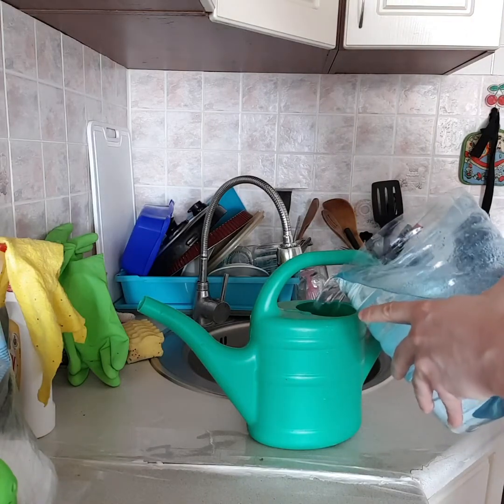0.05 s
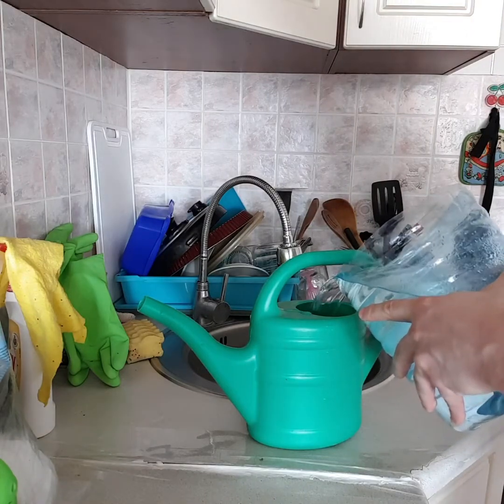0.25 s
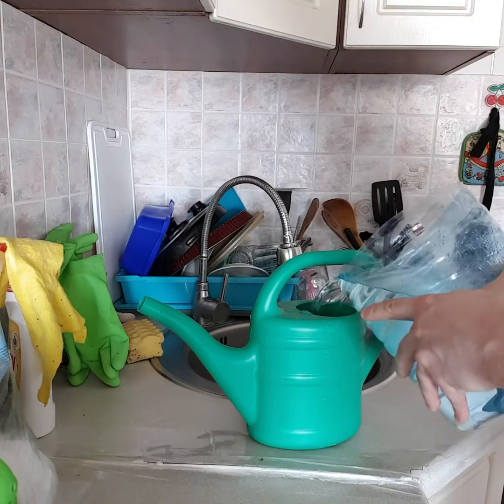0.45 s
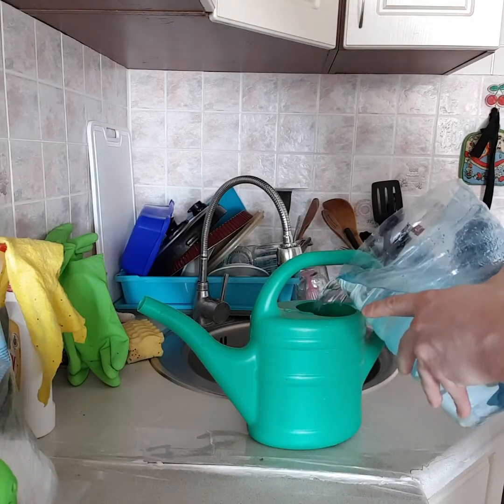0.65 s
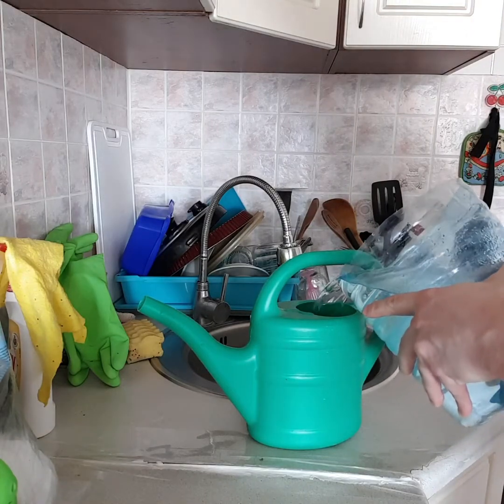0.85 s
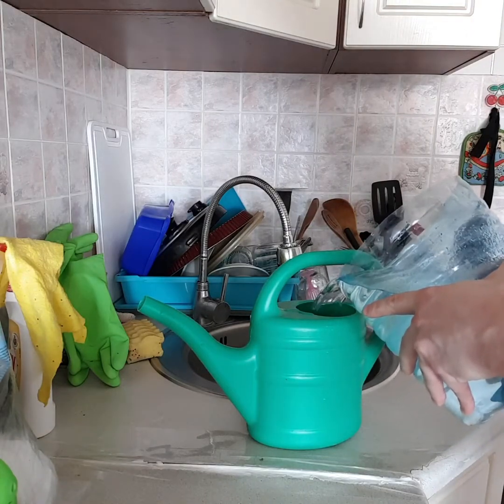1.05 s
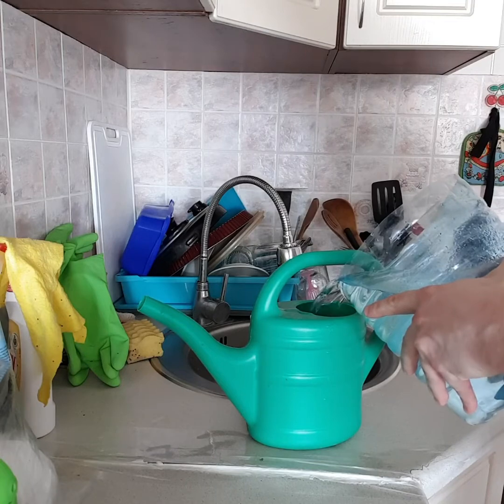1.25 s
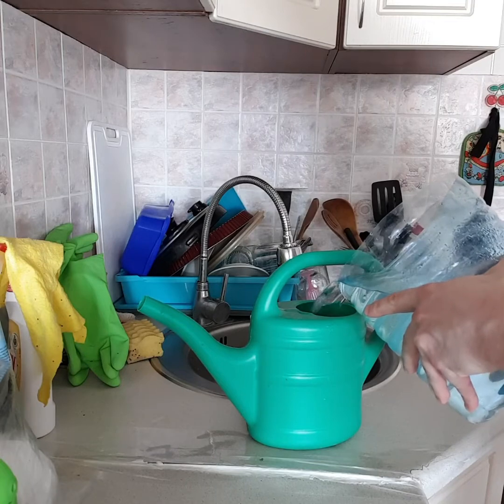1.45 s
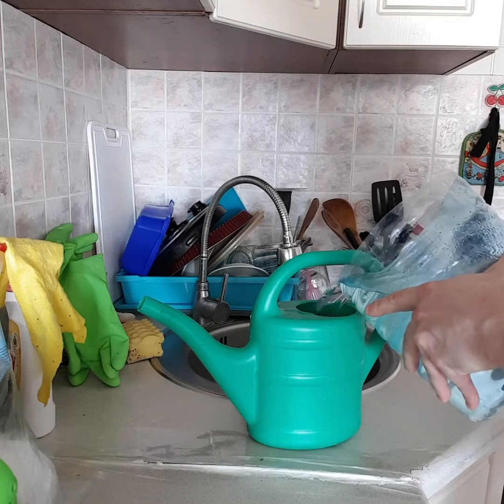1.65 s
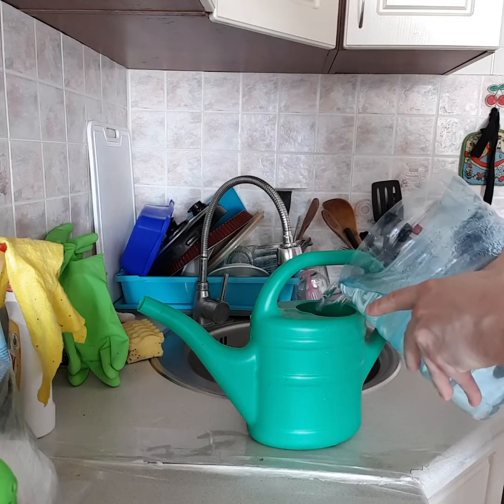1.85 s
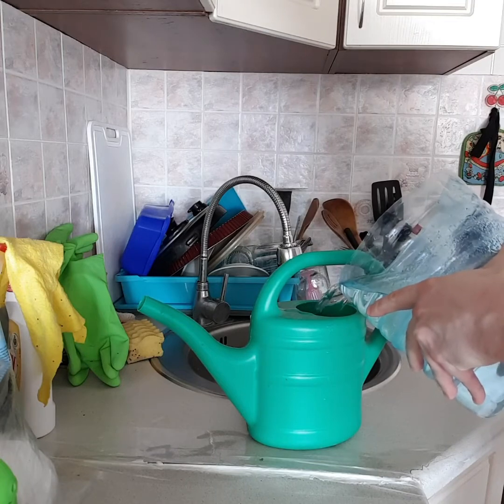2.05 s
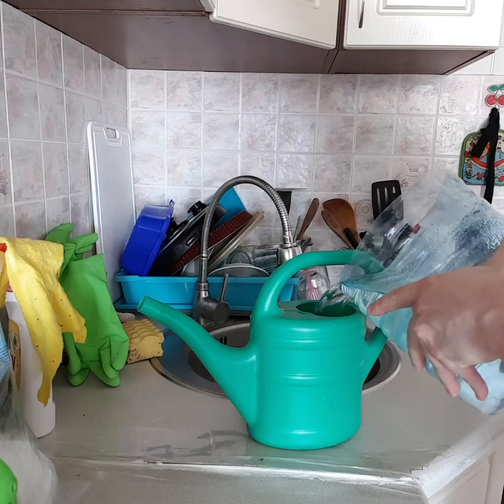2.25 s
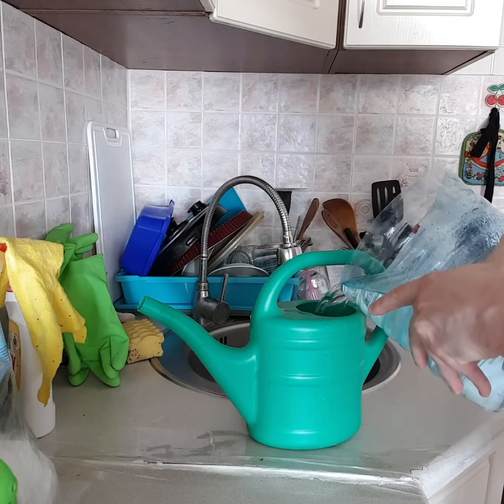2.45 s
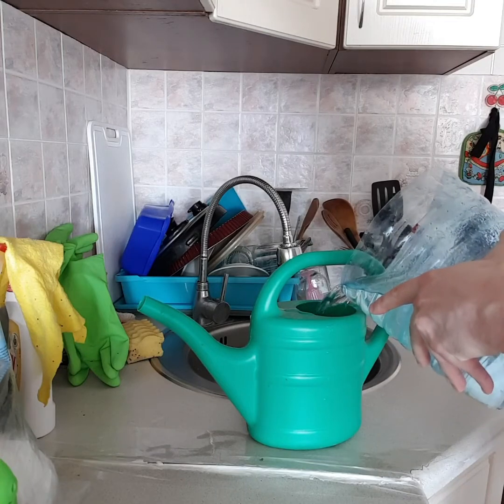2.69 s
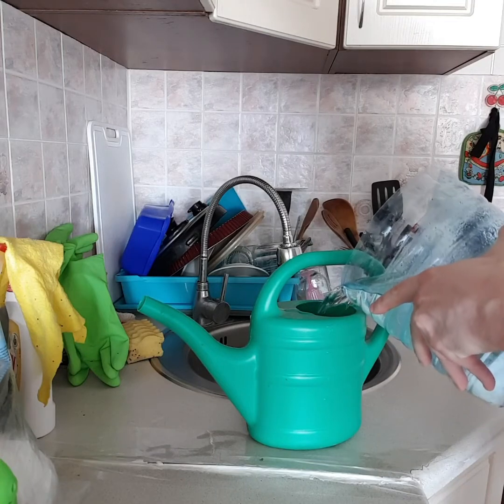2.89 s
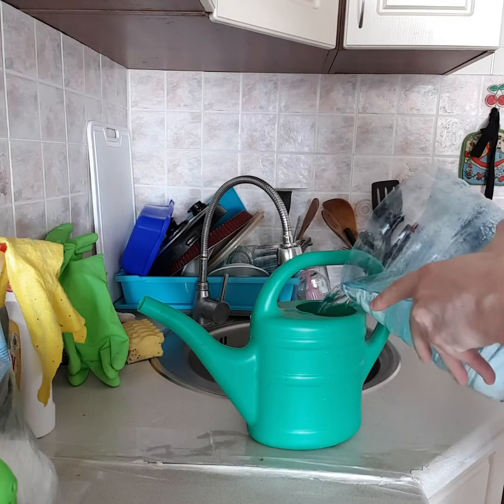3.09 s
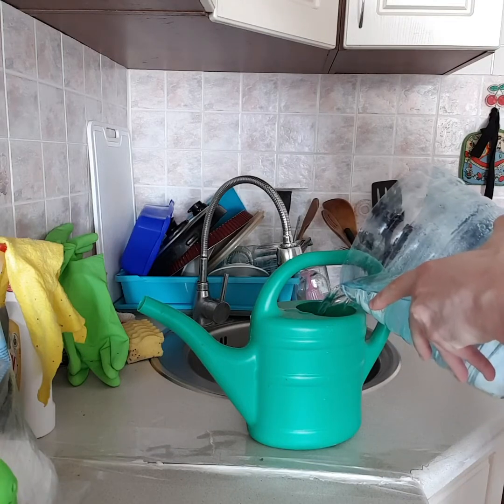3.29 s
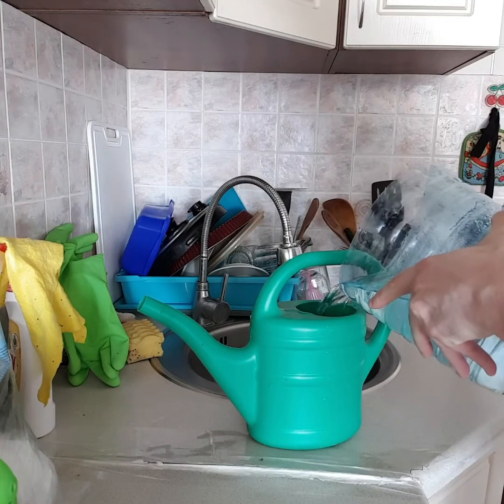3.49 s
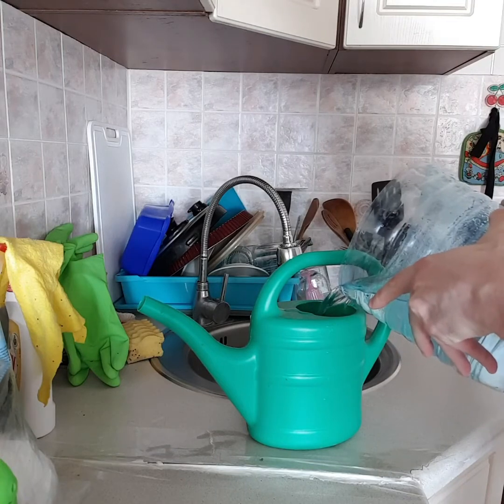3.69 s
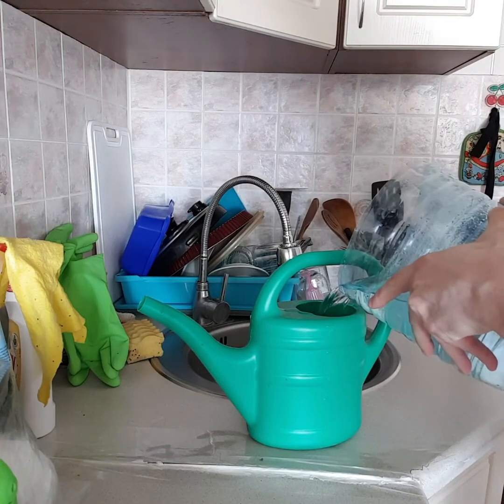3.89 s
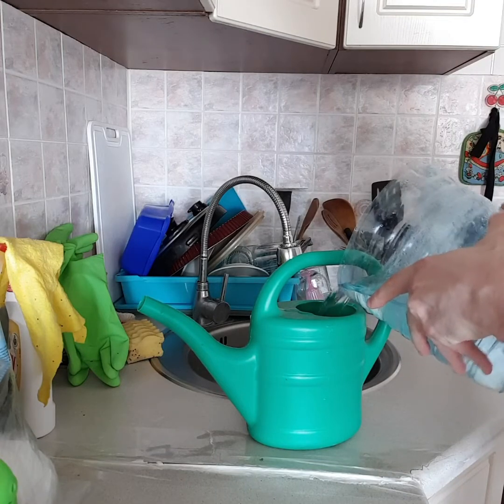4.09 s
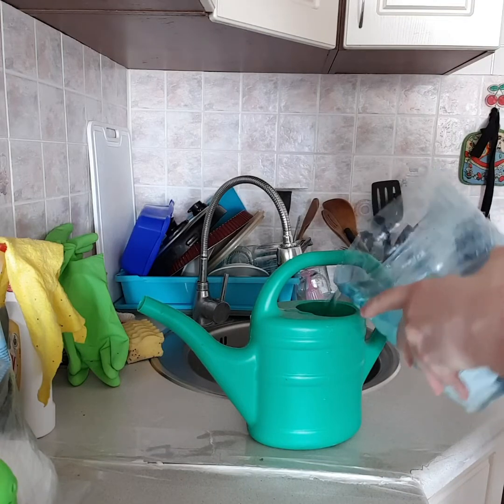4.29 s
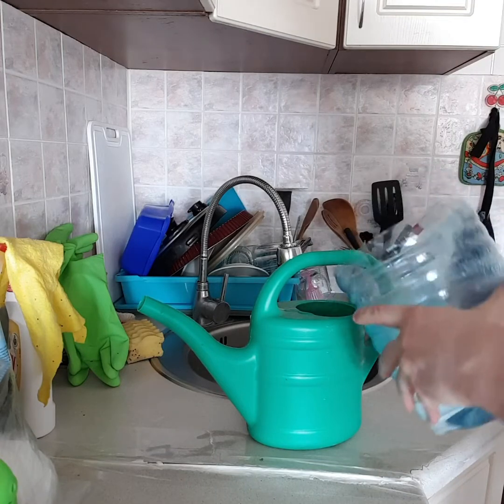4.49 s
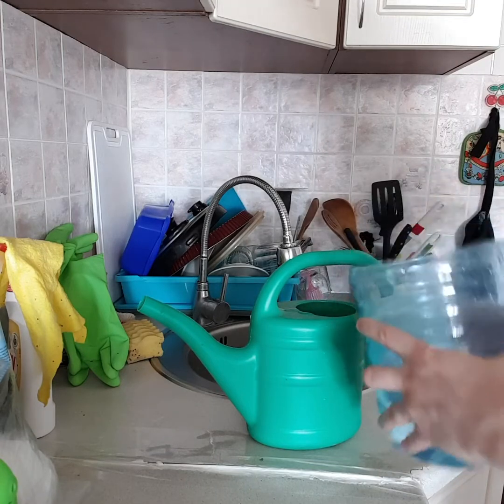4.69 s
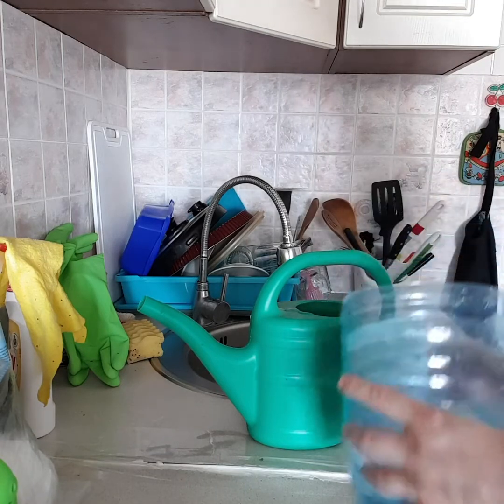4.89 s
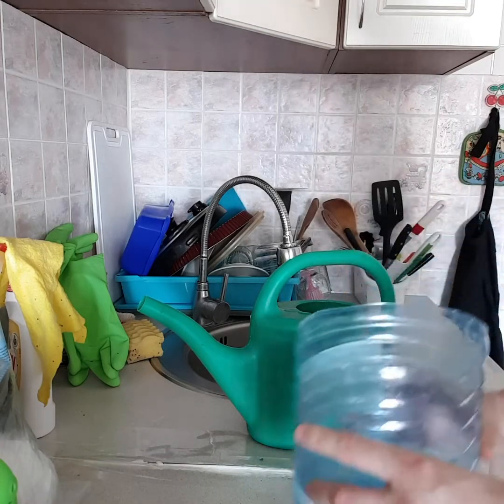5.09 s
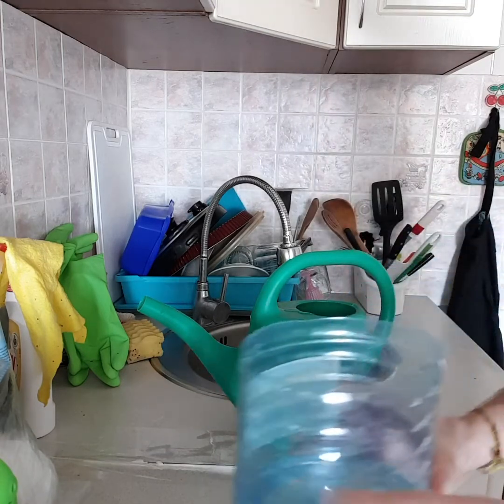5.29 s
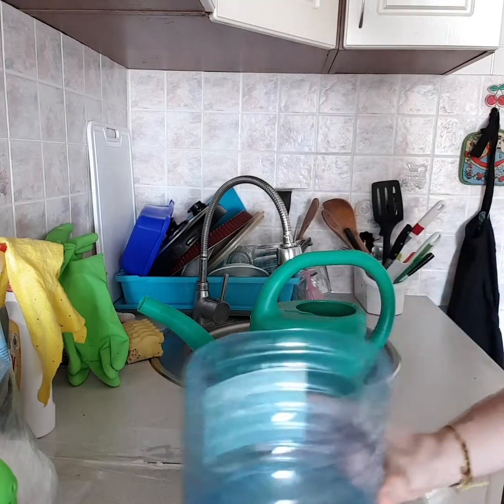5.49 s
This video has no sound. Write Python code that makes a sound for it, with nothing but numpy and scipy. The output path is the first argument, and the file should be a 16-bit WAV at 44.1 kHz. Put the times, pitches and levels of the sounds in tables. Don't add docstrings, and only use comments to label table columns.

```python
import sys
import numpy as np
from scipy import signal
from scipy.fft import rfft, irfft, next_fast_len
from scipy.io import wavfile
from scipy.ndimage import map_coordinates

SR = 44100
rng = np.random.default_rng(int(sys.argv[2]) if len(sys.argv) > 2 else 0)


def to_wav(sig):
    pcm = np.clip(np.atleast_2d(sig), -1, 1) * 32767
    pcm = np.round(pcm).astype(np.int16)
    wavfile.write(sys.argv[1], SR, pcm.T)


def gain_from_decibels(decibels):
    exponent = np.asarray(decibels, float) / 20
    return 10 ** exponent


N = 244314


def unit(x):
    return x / np.sqrt(np.mean(x ** 2) + 1e-20)


def along(points, hz):
    point_hz, value = np.transpose(points)
    return np.interp(np.log(hz + 1), np.log(point_hz + 1), value)


def over_time(s, level_db, left=None):
    return np.interp(np.arange(N) / SR, s, level_db, left=left, right=-120)


def wobble(rate_hz):
    knots = rng.standard_normal(int(N * rate_hz / SR) + 4)
    return map_coordinates(knots, [np.arange(N) * rate_hz / SR])


def filtered(x, response):
    n = x.shape[-1]
    size = next_fast_len(n + SR // 4)
    spectrum = rfft(x, size) * response(np.fft.rfftfreq(size, 1 / SR))
    return irfft(spectrum, size)[..., :n]


def peak(f, hz, width_hz):
    return 1j * f * width_hz / (hz * hz - f * f + 1j * f * width_hz)


# hz, correlation
PORT_LIKENESS = [(60, .99), (200, .98), (400, .9), (800, .75), (1500, .2), (6000, .1), (15000, .05)]


def diffuse(pair):
    def mid_side(hz):
        angle = np.arccos(np.clip(along(PORT_LIKENESS, hz), -1, 1)) / 2
        return np.array([np.cos(angle), np.sin(angle)])

    mid, side = filtered(pair, mid_side)
    return np.array([mid + side, mid - side])


def rush(spectrum):
    noise = rng.standard_normal((2, N))
    return unit(diffuse(filtered(noise, lambda hz: gain_from_decibels(along(spectrum, hz)))))


def bubbles(s, db, hz, cycles, pan_db, rise, size):
    hz_column = hz[:, None]
    turns = np.arange(size) / SR * hz_column
    age = turns / np.clip(cycles, 5, 90)[:, None]
    tone = np.sin(2 * np.pi * turns * (1 + rise * np.minimum(age, 2) / 2))
    tone *= np.exp(-2.3 * age) * (1 - np.exp(-turns / 1.45))
    tone *= hz_column * (1 + 2 * rise) < SR / 2
    at = (np.round(s * SR).astype(int)[:, None] + np.arange(size)).ravel()
    ears = []
    for side in (1, -1):
        ear = tone * gain_from_decibels(db + side * pan_db / 2)[:, None]
        ears.append(np.bincount(at, ear.ravel(), N + size + SR)[:N])
    return np.array(ears)


def swarm(hz, spread, cycles, scatter_db, count, size):
    s = rng.uniform(0, 3.45, count)
    pitch, life, pan, bulk = rng.standard_normal((4, count))
    db = scatter_db * np.clip(bulk, -2, 2)
    pitch_hz = hz * np.exp(spread * pitch)
    life_cycles = cycles * np.exp(0.4 * life)
    return unit(bubbles(s, db, pitch_hz, life_cycles, 4 * pan, rise=0.08, size=size))


# hz, t60_s
TILE_DECAY = [(150, 0.69), (1000, 0.3), (3000, 0.47), (7000, 0.22), (14000, 0.29)]


def tiles(x):
    out = np.zeros((2, N + SR))
    step, delay = SR // 4, 130
    for start in range(0, N, step):
        hz, t, z = signal.stft(rng.standard_normal((2, SR // 2)), SR, nperseg=256)
        decay = gain_from_decibels(-60 * t / along(TILE_DECAY, hz)[:, None])
        tail = diffuse(signal.istft(z * decay, SR, nperseg=256)[1])
        tail /= np.linalg.norm(tail[0])
        echo = signal.fftconvolve(x[None, start:start + step], tail, axes=1)
        out[:, start + delay:][:, :echo.shape[1]] += echo
    return out[:, :N]


# hz, level_db_per_hz
FRIDGE_SPECTRUM = [(13, -54), (22, -12.5), (70, -2), (122, -14), (160, 1), (194, -9), (278, -11.5),
                   (653, -32.5), (935, 0.5), (1340, -25.5), (1490, -32), (4260, -51), (5310, -24.5),
                   (5770, -60.5), (16000, -28.5)]


def fridge():
    drift_db = 0.6 * wobble(3)
    return gain_from_decibels(-62.5 + drift_db) * rush(FRIDGE_SPECTRUM)


# start_s, low_rub_db, high_rub_db
HAND_LEVELS = [(3.3, -83, -89), (3.56, -66.5, -78), (3.8, -69, -79), (3.92, -67.5, -73), (4.06, -67, -78),
               (4.23, -67, -82.5), (4.33, -65, -79), (4.38, -67, -76), (4.51, -62, -69), (4.57, -63, -78),
               (4.7, -62, -77), (4.83, -63, -71.5), (5.1, -62.5, -75), (5.25, -63.5, -75.5),
               (5.54, -69.5, -82)]
# hz, level_db_per_hz
LOW_RUB_SPECTRUM = [(30, -42), (70, 2), (200, -1.5), (500, -12), (900, -7), (1500, -55)]
# hz, level_db_per_hz
HIGH_RUB_SPECTRUM = [(700, -58), (1300, -5.5), (2000, -5), (3000, -9.5), (3900, -12.5), (4300, -4),
                     (5300, -1.5), (5800, -13), (15000, -19)]


def hands():
    s, low, high = np.transpose(HAND_LEVELS)
    low_db = over_time(s, low, left=-120) - 1.5
    high_db = over_time(s, high, left=-120) + 0.5 + 3.4 * wobble(14)
    return gain_from_decibels(low_db) * rush(LOW_RUB_SPECTRUM) + gain_from_decibels(high_db) * rush(HIGH_RUB_SPECTRUM)


# start_s, peak_db, centre_hz, width_octaves, t60_s
SPLAT_EVENTS = [(0.014, -45, 9000, .8, 0.034), (.205, -49.5, 9000, 0.63, 0.079),
                (.293, -35, 680, 1.1, 0.082), (0.474, -46.5, 8200, 0.66, 0.059),
                (.548, -51, 15000, 0.17, 0.026), (.6, -40, 2630, 0.28, 0.057),
                (0.653, -42, 7840, 1.1, 0.073), (0.777, -44.5, 13300, 0.52, 0.039),
                (0.897, -38.5, 7000, 0.42, 0.024), (0.955, -44, 7800, 0.43, 0.037),
                (1.13, -48, 2200, 0.32, 0.034), (1.191, -59, 11000, 0.21, 0.046),
                (1.254, -47, 4280, 1, 0.044), (1.288, -57.5, 10400, 0.24, 0.056),
                (1.465, -51, 8200, 0.54, 0.034), (1.64, -44.5, 7400, 0.41, 0.032),
                (1.772, -48, 7760, .3, 0.026), (1.794, -44.5, 6500, 0.36, 0.047),
                (1.82, -44, 11100, 0.27, 0.026), (2.028, -52, 2230, 0.92, 0.15),
                (2.07, -60.5, 6800, 0.23, 0.033), (2.132, -51, 1480, 1.13, 0.081),
                (2.21, -57.5, 7000, 0.48, .03), (2.239, -66.5, 4060, 0.12, 0.2),
                (2.44, -55, 4000, 0.46, 0.038), (2.299, -63, 7200, 0.15, .04),
                (2.782, -44.5, 2650, 0.88, 0.046), (2.791, -55.5, 444, 0.32, .12),
                (2.787, -60, 9800, 0.32, 0.034), (2.864, -42.5, 2150, 0.48, 0.03),
                (2.933, -72, 13500, .2, 0.045), (2.993, -60.5, 6630, 0.18, 0.057),
                (3.122, -47, 2200, 0.68, 0.032), (3.174, -47.5, 2780, 0.48, 0.026),
                (3.185, -70, 11000, 0.18, .05), (3.546, -59, 8700, .3, 0.039),
                (3.753, -53.5, 7700, 0.46, 0.055), (3.799, -70.5, 1940, 0.26, 0.46),
                (3.96, -68, 1870, .35, 0.28), (4.375, -68, 4890, 0.091, 0.73),
                (4.482, -47.5, 4400, 0.13, 0.034), (4.491, -46.5, 1584, 0.21, 0.12),
                (4.505, -56.5, 5250, .1, 0.047), (4.404, -63, 4900, 1.8, 0.2),
                (4.413, -62, 7900, .6, 0.052), (4.453, -52.5, 7100, 0.16, 0.022),
                (4.482, -47.5, 7000, 0.6, 0.024), (4.485, -47.5, 487, 1.27, 0.21),
                (4.499, -51.5, 13000, .25, 0.027), (4.616, -63, 2940, 1.27, 0.18),
                (4.829, -73, 4940, 1.1, .1), (5.02, -76, 1990, .8, 0.057), (5.18, -66, 3470, 0.94, 0.044)]


def splats():
    out = np.zeros((2, N + SR))
    t = np.arange(SR // 6) / SR
    attack = 1 - np.exp(-t / 0.0025)
    for s, db, hz, octaves, t60_s in SPLAT_EVENTS:
        band = lambda f: np.exp(-(np.log2((f + 1) / hz) / octaves) ** 2)
        puff = unit(filtered(rng.standard_normal((2, len(t))), band))
        out[:, round(s * SR):][:, :len(t)] += gain_from_decibels(db + 3.0 - 60 * t / t60_s) * attack * puff
    return out[:, :N]


# start_s, peak_db, crack_db, crack_top_hz, crack_t60_s, attack_s
KNOCK_EVENTS = [
    (.955, -17.5, -4.5, 1200, 0.037, 0.0039),
    (1.463, -22.5, 0.5, 2200, 0.041, 0.0008),
    (4.421, -31, 5.5, 664, 0.068, 0.0011),
]
# pitch_hz, level_db, t60_s
KNOCK_MODES = [
    [(353, -5.5, 0.2), (784, -2.5, 0.08), (837, -6, 0.23), (884, -4.5, .12), (1276, -20, 0.1),
     (93.5, -19.5, 0.19)],
    [(527.4, -2, .12), (890, -10.5, 0.15), (2080, 2, 0.019), (169, -16.5, 0.17)],
    [(270, -15, 0.066), (414, -2, .1), (151, -5, .1), (123, -7.5, 0.15)],
]


def knocks():
    out = np.zeros(N + SR)
    t = np.arange(SR // 2) / SR
    for (s, db, crack_db, top_hz, t60_s, attack_s), modes in zip(KNOCK_EVENTS, KNOCK_MODES):
        ring = sum(gain_from_decibels(level_db - 60 * t / life_s) * np.sin(2 * np.pi * hz * t)
                   for hz, level_db, life_s in modes)

        def dull(f):
            low_cut = (1j * f / (90 + 1j * f)) ** 2
            soft_top = (1 + 1j * f / top_hz) ** 2
            high_cut = (1 + (1j * f / 3200) ** 2 + 1.2j * f / 3200) ** 2
            return low_cut / soft_top / high_cut

        crack = unit(filtered(rng.standard_normal(len(t)), dull))
        crack *= gain_from_decibels(crack_db - 60 * t / t60_s)
        attack = 1 - np.exp(-t / attack_s)
        out[round(s * SR):][:len(t)] += gain_from_decibels(db - 1) * (ring + crack) * attack
    return out[:N]


# start_s, level_db
AIR_LEVEL = [(0.0, -62), (0.29, -57.5), (0.73, -57.5), (1.04, -54.5), (1.52, -65.5), (1.62, -64),
             (2.04, -71.5), (2.25, -80), (2.4, -89)]
# pitch_hz, width_hz
AIR_RESONANCE = (344, 42)


def air():
    level_db = over_time(*np.transpose(AIR_LEVEL))
    note = filtered(rng.standard_normal((2, N)), lambda f: peak(f, *AIR_RESONANCE) ** 2)
    return gain_from_decibels(level_db + 4.5) * unit(diffuse(note))


# start_s, peak_db, pitch_hz, life_cycles, left_right_db
LOW_BUBBLES = [(0.206, -50, 550, 11, 6), (0.238, -44.5, 940, 7.8, -7), (0.27, -45, 675, 5.8, -0.5),
               (0.294, -45, 740, 4.6, 3), (0.37, -45.5, 945, 12, -4.5), (0.475, -47.5, 910, 10.5, -6),
               (0.541, -43.5, 750, 6.2, 3), (0.658, -41.5, 684, 6.3, -1), (0.714, -43.5, 757, 6.6, -1.0),
               (0.84, -59, 730, 5.3, 3), (0.888, -46, 805, 6.4, -6), (1.627, -45.5, 920, 6.1, -8),
               (1.824, -49.5, 920, 5.9, -8), (2.028, -51, 950, 6.3, -10), (2.138, -55.5, 682, 17, -0.5),
               (2.792, -48, 950, 7.9, -5), (2.87, -45.5, 914, 6.6, 1), (3.124, -53, 1010, 4.6, -7)]
# start_s, peak_db, pitch_hz, life_cycles, left_right_db
MIDDLE_BUBBLES = [(0.0872, -50.5, 1860, 8.8, -12), (0.1321, -48, 1750, 12, 8), (0.176, -48, 1950, 6.2, 7),
                  (0.2064, -46, 1444, 7.8, 0), (0.2278, -44, 1540, 6.9, 17), (0.2793, -51, 1410, 12, -1),
                  (0.3467, -36.5, 1680, 5.4, 12), (0.4119, -39.5, 1640, 6.7, 2),
                  (0.4776, -41.5, 1580, 10.4, -5), (0.5048, -44, 1285, 12, 6.5),
                  (0.5608, -41, 1640, 7.7, -11), (0.5975, -46, 1570, 10, -7),
                  (0.6509, -36.5, 1650, 6.1, -1), (0.7325, -38, 1660, 7.2, -10.5),
                  (0.8885, -34, 1673, 6.1, -11), (0.9524, -58, 1270, 7.6, 4.0),
                  (1.1044, -50, 1440, 7.8, -1), (1.1277, -56.5, 1230, 11, 12.5),
                  (1.1937, -62, 1430, 5.7, 1), (1.2514, -48.5, 1550, 6.9, -1), (1.3084, -56, 1560, 10, -10),
                  (1.347, -61, 1760, 14, 2.0), (1.4637, -35.5, 1470, 3.8, 16.5),
                  (1.6736, -50, 1550, 6.7, 7), (1.712, -62, 1600, 9.2, 13), (1.7607, -44, 2520, 9.2, 1),
                  (1.9385, -57.5, 1940, 9.2, 10), (1.9784, -55, 2380, 6.3, 14),
                  (2.0254, -46, 2540, 10.4, 4), (2.1355, -53, 2370, 6.3, -3), (2.2099, -57, 1685, 13, 6),
                  (2.5672, -56, 2680, 11, 5), (2.7851, -40.5, 1670, 5.8, -1.5), (2.865, -52, 1750, 12, 5),
                  (2.9503, -56, 1750, 14, 5), (3.029, -58, 1830, 7.5, 16), (3.096, -65, 2330, 12, 12),
                  (3.1196, -61, 1680, 10, 12), (3.1725, -53, 1670, 8.5, 6), (3.2171, -56, 1425, 10, 1)]
# start_s, peak_db, pitch_hz, life_cycles, left_right_db
HIGH_BUBBLES = [(0.0144, -56, 4970, 9.8, 11.5), (0.0832, -61, 4430, 10, 11), (0.1022, -44, 5130, 12, 15),
                (0.2523, -44, 4950, 13, 14.0), (0.4471, -42.5, 5050, 8.7, 29), (0.598, -63, 4800, 12, 12.0),
                (0.6493, -33, 4630, 14, 17.7), (0.8941, -34.5, 4950, 8.6, 21.3),
                (1.0755, -41, 4730, 12, 14.0), (1.1593, -66, 4630, 11, 13.5),
                (1.4651, -47.5, 4800, 11.3, 26), (1.7928, -41, 4840, 7, 15.5),
                (2.0112, -59.5, 4700, 15, 31), (2.1326, -46, 4900, 10.5, 22.5),
                (2.2082, -46, 4920, 8.1, 19), (2.4995, -57, 4720, 14, 25), (2.5354, -49.5, 4790, 14, 25.4),
                (2.61, -51, 4780, 9, 23), (2.786, -36.5, 4540, 5, 16), (3.7539, -57.5, 4880, 8.6, 41.5)]
# start_s, peak_db, pitch_hz, life_cycles, left_right_db
LAST_DRIPS = [(2.0342, -46, 1667, 45, 5.2), (3.4226, -71, 2620, 45, 3.0), (3.4778, -63.5, 2582, 45, 12.4),
              (3.613, -76.5, 1790, 45, 19), (3.7619, -50, 3025, 45.5, 17), (3.8059, -56.5, 3050, 45, 12),
              (3.8412, -66, 3080, 45, 7.9), (4.2847, -66.5, 2016, 44.8, 13.5)]


def drips():
    low = gain_from_decibels(12) * bubbles(*np.transpose(LOW_BUBBLES), rise=0.033, size=3000)
    middle = gain_from_decibels(14.5) * bubbles(*np.transpose(MIDDLE_BUBBLES), rise=0.076, size=1500)
    high = gain_from_decibels(3.95) * bubbles(*np.transpose(HIGH_BUBBLES), rise=0.075, size=600)
    last = gain_from_decibels(3.5) * bubbles(*np.transpose(LAST_DRIPS), rise=0.0055, size=4000)
    return low + middle + high + last


# pitch_hz, width_hz, level_db
CAN_MODES = [(670, 360, -16.5), (846, 54, 1), (1274, 18, -8), (1750, 85, -1.5), (2426, 380, -9)]


def can(f):
    modes = sum((-1) ** k * gain_from_decibels(db) * peak(f, hz, width_hz)
                for k, (hz, width_hz, db) in enumerate(CAN_MODES))
    return 0.2 + modes


def gurgle():
    big = swarm(hz=623.4, spread=0.488, cycles=6.5, scatter_db=4.0, count=2000, size=900)
    return unit(filtered(big, can))


def splash():
    small = swarm(hz=2127, spread=0.398, cycles=11, scatter_db=5.5, count=3000, size=400)
    return unit(small + 3.3 * unit(filtered(small, can)))


# hz, level_db_per_hz
SPRAY_SPECTRUM = [(2060, -37), (3500, -7.5), (5000, 7), (5710, -34.5), (6870, -2), (8800, -17),
                  (14800, -12.5), (16000, -76)]


def spray():
    fizz = swarm(hz=7000, spread=0.45, cycles=6.9, scatter_db=2, count=10000, size=120)
    gusts = gain_from_decibels(6.0 * wobble(34))
    return 0.74 * fizz + 0.49 * gusts * rush(SPRAY_SPECTRUM)


# hz, level_db_per_hz
WALL_SPECTRUM = [(15, -56), (25, -20), (54, -14.5), (91, 3), (112, 4), (216, -17.5), (260, -12.5), (340, 1),
                 (570, -120)]
# start_s, wall_rumble_db, gurgle_db, splash_db, spray_db
STREAM_LEVELS = [(0.0, -50.5, -50, -46.5, -49), (0.13, -55.5, -58.5, -56, -55.5),
                 (0.3, -46.5, -50, -46.5, -49), (0.42, -47, -58.5, -52, -54), (0.59, -50, -51, -51, -52),
                 (0.77, -48.5, -55, -49.5, -51.5), (0.87, -55, -52.5, -51.5, -54.5),
                 (1.25, -63, -59.5, -60.5, -61.5), (1.33, -54, -62, -55, -64),
                 (1.51, -66.5, -56.5, -64, -67.5), (1.67, -71, -56.5, -51.5, -59.5),
                 (1.84, -58, -64, -59.5, -61), (2.05, -68, -69.5, -62, -77.5), (2.15, -67, -57, -60, -67.5),
                 (2.29, -81, -75, -65.5, -72.5), (2.44, -75, -82, -75, -73), (2.57, -64.5, -66, -62.5, -73),
                 (2.74, -68.5, -69, -65, -75.5), (3.05, -68, -74, -70, -72), (3.13, -76, -70, -58, -74),
                 (3.29, -69, -79, -86, -81), (3.45, -75.5, -76.5, -92, -83)]


def stream():
    s, *levels = np.transpose(STREAM_LEVELS)
    rumble_db, gurgle_db, splash_db, spray_db = [over_time(s, level) for level in levels]
    surge = wobble(9)
    water = gain_from_decibels(gurgle_db - 3 + 1.5 * surge + 1.5 * wobble(17)) * gurgle()
    water += gain_from_decibels(splash_db - 1 + 0.54 * surge + 0.47 * wobble(12)) * splash()
    water += gain_from_decibels(spray_db - 3 + 0.6 * surge + 0.43 * wobble(13)) * spray()
    rumble = gain_from_decibels(rumble_db + 0.22 * surge + 3.7 * wobble(12)) * rush(WALL_SPECTRUM)
    return water, rumble


# hz, left_right_db
LEFT_LEAN = [(60, 6), (150, -2.5), (330, -3.5), (700, 1.5), (1400, 1), (2800, 8.5), (5000, 13.5),
             (9000, -1.7), (14000, 11)]
# hz, phase_rad
PHASE_TWIST = [(100, .1), (210, .15), (340, 1.6), (520, 1.1), (800, .8), (1200, .4), (2000, .02)]
# hz, level_db
ECHO_LEVEL = [(100, -4.5), (500, -5), (1700, -2), (3000, -4.5), (7000, 0.5), (14000, 3)]


def scene():
    water, rumble = stream()
    drops, puffs, blows = drips(), splats(), knocks()

    def lean(hz):
        return gain_from_decibels(along(LEFT_LEAN, hz) * [[0.5], [-0.5]])

    def lead(hz):
        delay_rad = 2 * np.pi * np.maximum(hz - 700, 0) * 0.0003
        phase_rad = delay_rad + along(PHASE_TWIST, hz)
        return np.exp(1j * phase_rad * np.array([[0.5], [-0.5]]))

    sent = water.mean(0) + gain_from_decibels(1.96) * drops.mean(0) + gain_from_decibels(0.5) * puffs[0] + gain_from_decibels(-2.0) * blows
    echo = tiles(filtered(sent, lambda hz: gain_from_decibels(along(ECHO_LEVEL, hz))))
    leaning = filtered(water + puffs + echo + blows + air(), lean)
    background = fridge() + hands()
    return filtered(leaning + drops + rumble + background, lead)


def roll_off(x):
    return signal.sosfilt(signal.butter(12, 16520, fs=SR, output="sos"), x)


# pitch_hz, width_hz, level_db
PORT_PEAK = (5190, 316, 3.7)


def record(dry):
    hz, width_hz, db = PORT_PEAK
    top_hz = 15560
    port = lambda f: (1 + (gain_from_decibels(db) - 1) * peak(f, hz, width_hz)) * (f < top_hz)
    mix = filtered(dry, port)
    return roll_off(mix)


dry = scene()
out = record(dry)
to_wav(out)
```